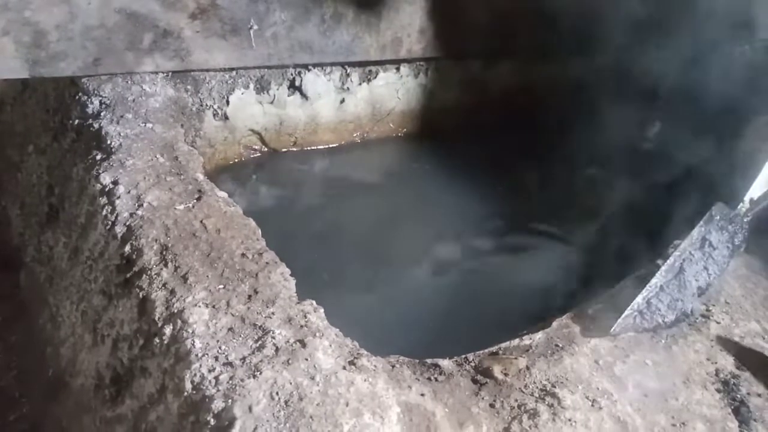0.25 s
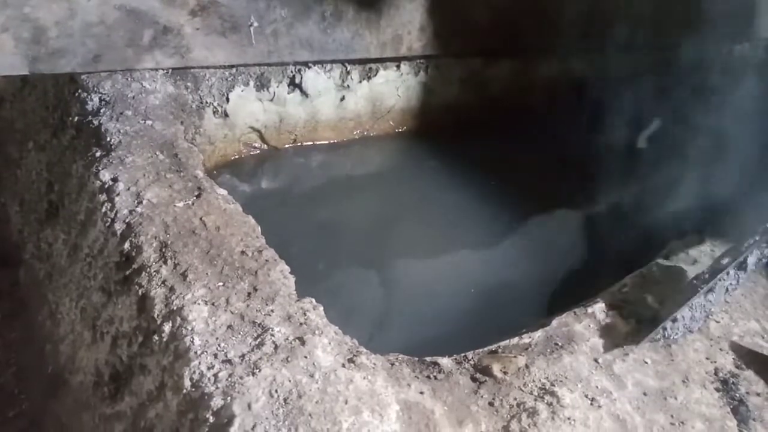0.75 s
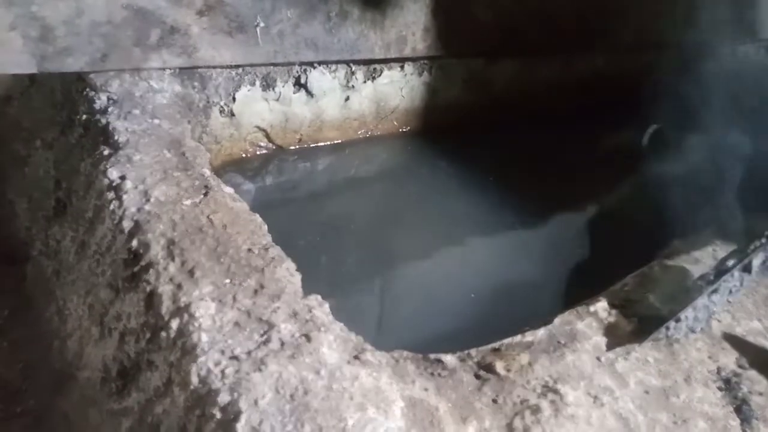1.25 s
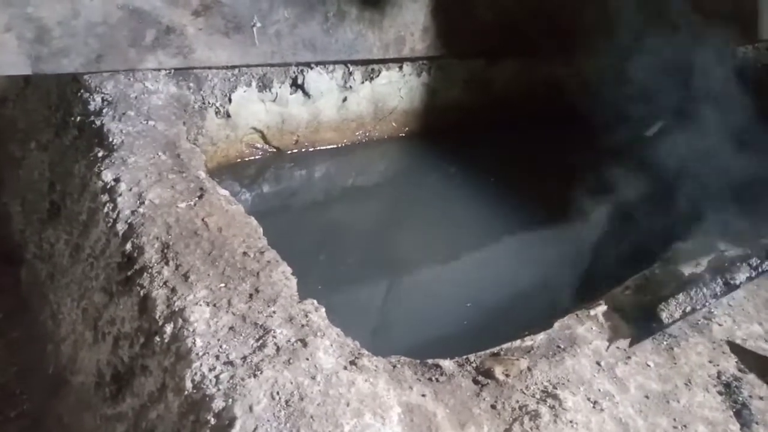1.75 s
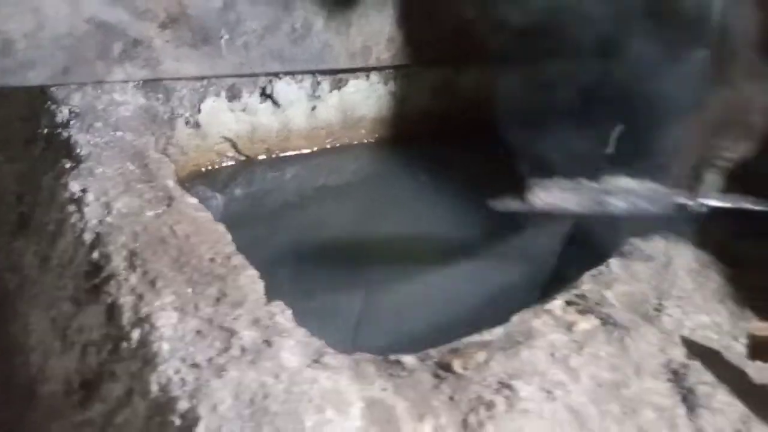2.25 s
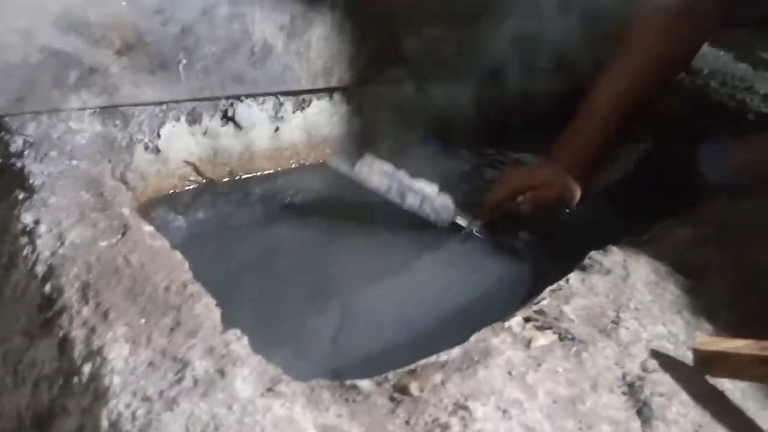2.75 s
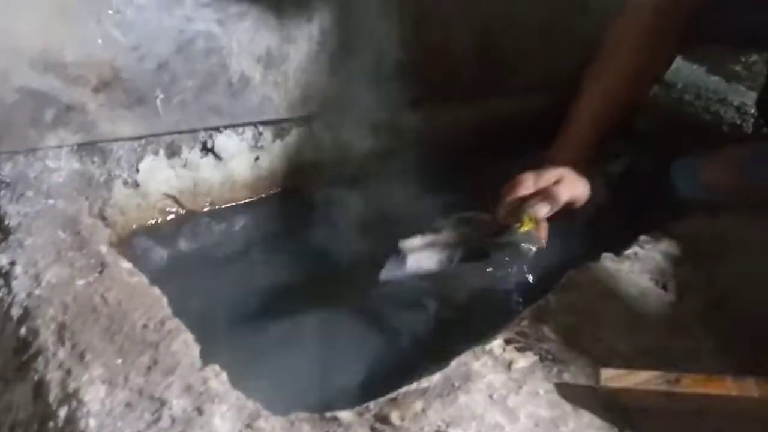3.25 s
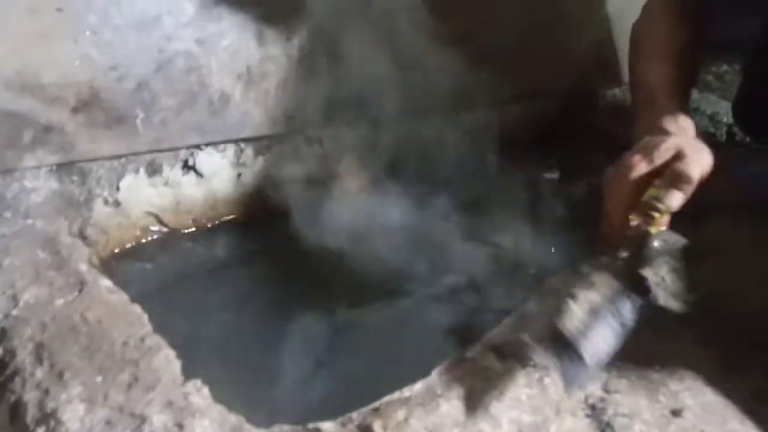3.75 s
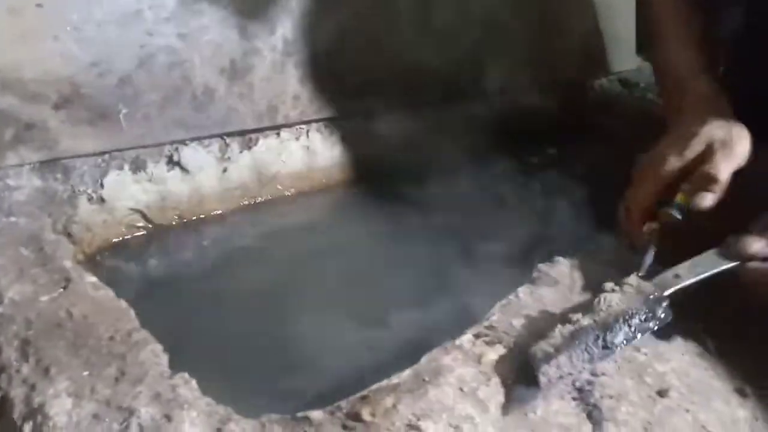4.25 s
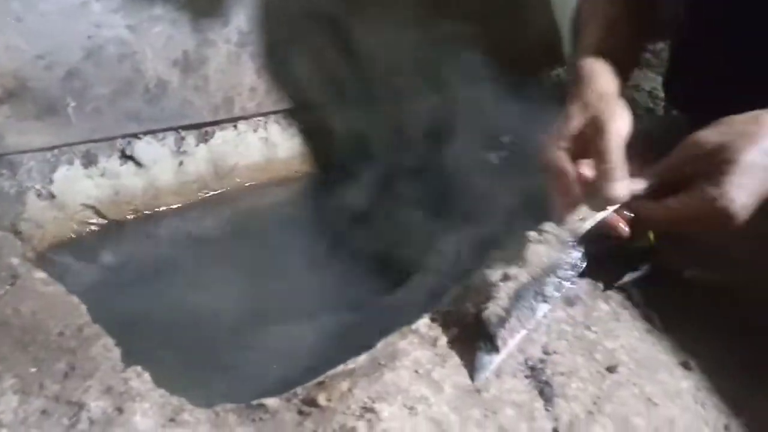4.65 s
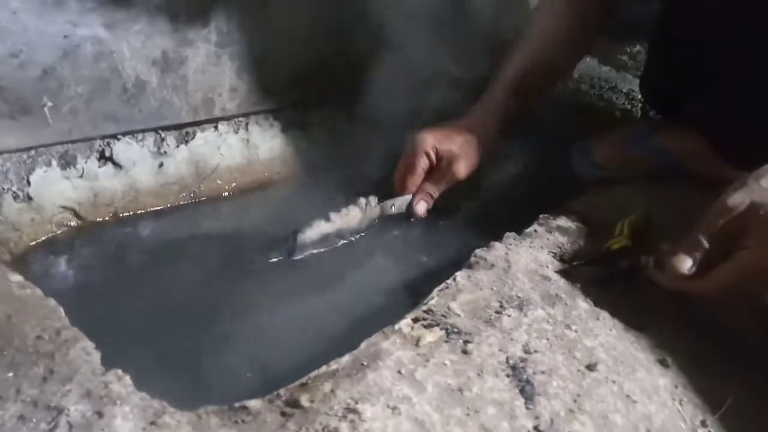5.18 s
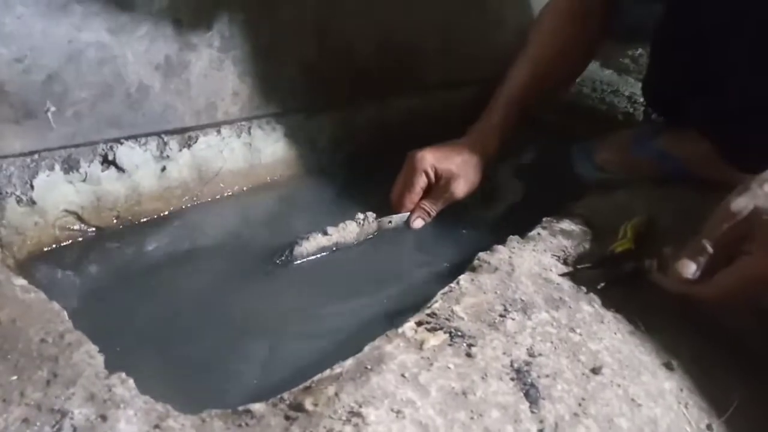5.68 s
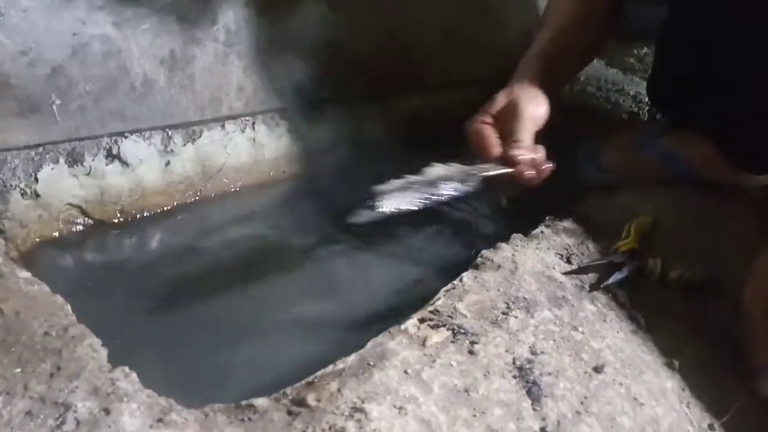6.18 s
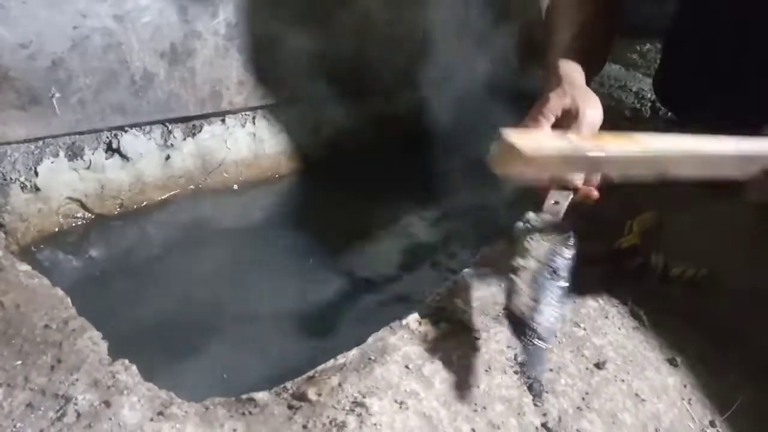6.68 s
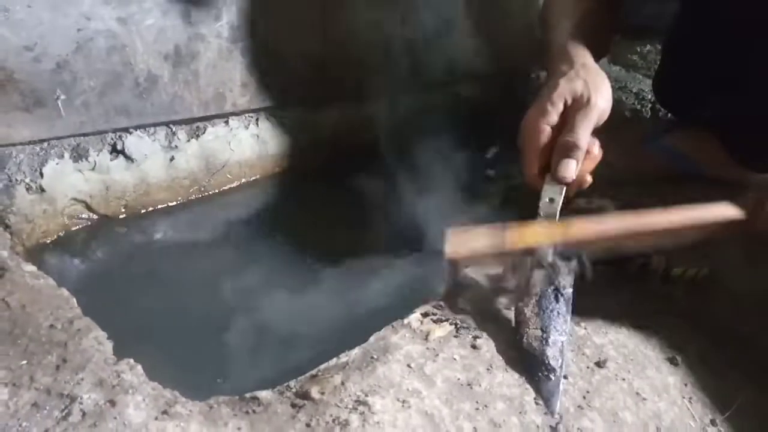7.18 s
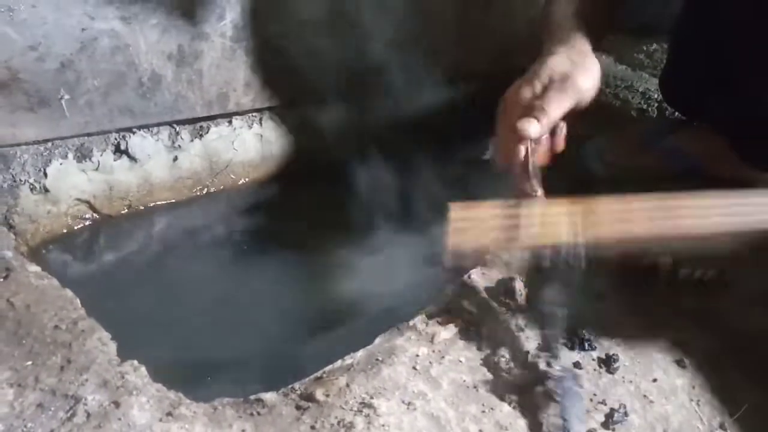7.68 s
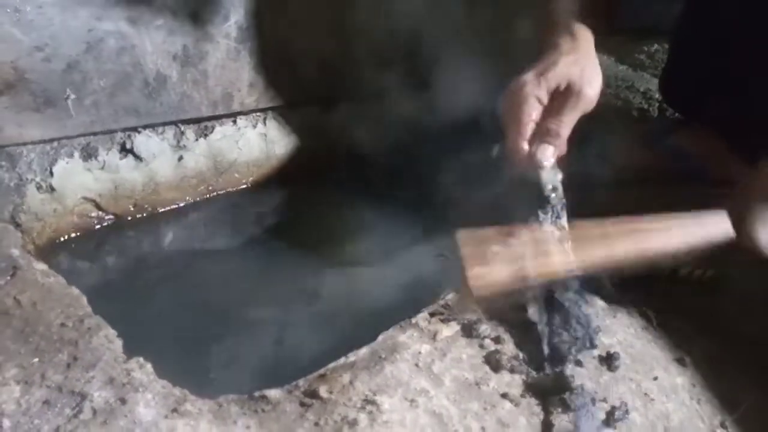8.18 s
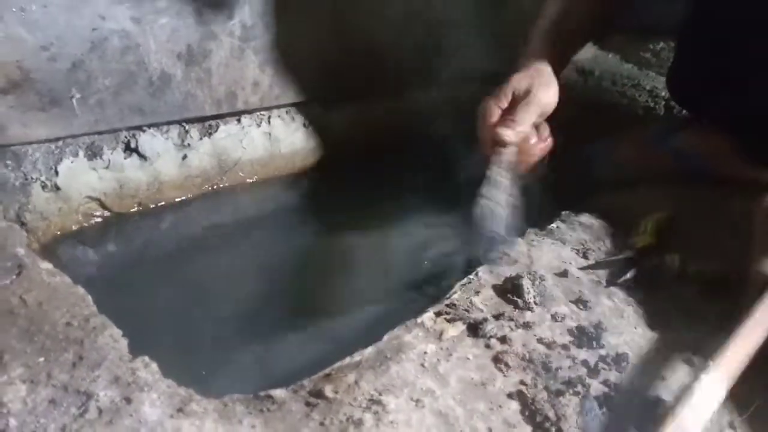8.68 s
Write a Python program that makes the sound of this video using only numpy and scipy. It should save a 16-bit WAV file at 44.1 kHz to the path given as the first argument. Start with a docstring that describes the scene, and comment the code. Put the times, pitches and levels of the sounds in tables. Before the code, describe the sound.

A steady airy hiss with a faint whistling edge and a low distant traffic rumble, engine notes swelling and sagging, run throughout; a thin insect pulses high up. In the first second a far bird gives quick falling chirps amid faint steam sizzles. Around 2.7 a few ticks and a tiny drip, at 3.0 a light tap. From 3.6 to 4.1 hard knocks of a clay-coated blade on concrete crack and clank, the loudest at 3.63, 3.8 and 4.0, with wet drops; another dull knock at 4.4. Soft sizzle, bubbling and lapping follow, a low bump at 4.85, faint chirps near 5.7-6.1. At 6.2-6.4 a light clattering run. From 7.1 to 7.4 a wooden slat scrapes crunchy, gritty clay, with smaller snaps after. A second scrape at 8.0-8.3 ends in a firm knock, then crumbs and bright chips tick down until 8.8. Close microphone, short dull reflections.

```python
"""Steady hiss, a low rumble like far traffic, faint sizzles and a distant bird come first; an insect pulses thinly.
A clay-coated blade, hot from the forge, is then knocked on the concrete rim of a water trough:
shaped noise cracks, decaying sines ring the steel. A wooden slat scrapes off gritty clay (dense random
fractures through resonances) and crumbs tick down. Drops are pings; steam, water, hiss and rumble are
mostly filtered noise; bubbles, engine notes and chirps are gliding sines."""
import sys
import numpy as np
from scipy import signal
from scipy.fft import rfft, irfft, next_fast_len
from scipy.io import wavfile
from scipy.ndimage import uniform_filter1d, minimum_filter1d

SR = 44100
rng = np.random.default_rng(int(sys.argv[2]) if len(sys.argv) > 2 else 0)


def transcribe(signal):
    """Save signal, clipped to [-1, 1], as a 16-bit WAV file at the path in sys.argv[1]."""
    frames = np.atleast_2d(signal).T
    limited = np.clip(frames, -1, 1)
    pcm = np.round(limited * 32767).astype(np.int16)
    wavfile.write(sys.argv[1], SR, pcm)


N = 393813
TIME = np.arange(N) / SR
RING = TIME[:SR // 4]  # time axis of one short event

# spectrum of clay breaking up: freq_hz, density_db (relative, per Hz)
GRIT_SPECTRUM = [(250, -58), (500, 2.5), (680, -3.5), (900, 1), (1700, 0), (2200, 7), (3000, 2.5),
                 (3900, 2.5), (5000, -13), (5600, -12.5), (6400, -11.5), (7900, -14.5), (9300, -31),
                 (15500, -33.5)]


def undb(db):
    """Decibels to gain."""
    return 10 ** (np.asarray(db) / 20)


def unit(x):
    """Scale to rms 1."""
    return x / np.sqrt(np.mean(x ** 2))


def punch(x):
    """Scale an event to the energy of rms 1 held for 10 ms."""
    return x / np.sqrt(np.sum(x ** 2) / (SR / 100))


def curve(rows, axis=1):
    """One column of a table, joined by straight lines in time."""
    rows = np.array(rows)
    return np.interp(TIME, rows[:, 0], rows[:, axis])


def fade(t60_s):
    """Exponential decay, 60 dB in t60_s."""
    return np.exp(-np.log(1000) * RING / t60_s)


def gate(start_s, length_s, half_rise_s, release_s):
    """Linear rise centred on the start, hold, exponential release (time constant)."""
    rise = np.clip((TIME - start_s) / half_rise_s / 2 + .5, 0, 1)
    return rise * np.exp(-np.maximum(TIME - start_s - length_s, 0) / release_s)


def surges(rows):
    """Sum of bell-shaped swells, length_s wide between their 1/e points."""
    return sum(undb(db) * np.exp(-(2 * (TIME - center_s) / length_s) ** 2)
               for center_s, length_s, db in rows)


def walk(knots_per_s):
    """Random values joined by straight lines, standard deviation about 0.56."""
    knots = rng.standard_normal(int(N / SR * knots_per_s) + 2)
    return 0.68 * np.interp(TIME * knots_per_s, np.arange(len(knots)), knots)


def shape(hz, points):
    """Gain at hz, from spectrum points joined in dB over log frequency."""
    f, db = np.transpose(points)
    return undb(np.interp(np.log(hz + 1), np.log(f), db))


def colour(x, points):
    """Give a long sound a spectrum."""
    size = next_fast_len(len(x))
    gain = shape(np.fft.rfftfreq(size, 1 / SR), points)
    return irfft(rfft(x, size) * gain, size)[:len(x)]


def strike(x, points, contact_hz, size=1024):
    """Minimum-phase colour of a blow: a softer contact rolls off the treble."""
    hz = np.fft.rfftfreq(size, 1 / SR)
    gain = shape(hz, points) / np.sqrt(1 + (hz / contact_hz) ** 5.8)
    # folding the cepstrum makes the filter causal
    cepstrum = irfft(np.log(gain))
    cepstrum[1:size // 2] *= 2
    cepstrum[size // 2 + 1:] = 0
    return signal.fftconvolve(x, irfft(np.exp(rfft(cepstrum))))[:len(x)]


def band(x, hz, width_hz):
    """One resonance."""
    return signal.lfilter(*signal.iirpeak(hz, hz / width_hz, fs=SR), x)


def noise_band(hz, width_hz):
    """White noise through the same resonance twice, at rms 1."""
    return unit(band(band(rng.standard_normal(N), hz, width_hz), hz, width_hz))


def add(out, s, x):
    """Mix a sound in at a time."""
    i = max(int(s * SR), 0)
    out[i:i + len(x)] += x[:max(N - i, 0)]


def mode(hz, t60_s):
    """One fading partial with a random phase."""
    return np.sin(2 * np.pi * (hz * RING + rng.random())) * fade(t60_s)


def ping(hz, t60_s):
    """One short ring with a soft start."""
    return punch((1 - np.exp(-(RING / 0.0005) ** 2)) * mode(hz, t60_s))


def burst(points, t60_s, contact_hz):
    """A splinter of coloured, decaying noise."""
    return punch(strike(rng.standard_normal(len(RING)) * fade(t60_s), points, contact_hz))


def snap(t60_s):
    """The bright tick of a flake breaking off."""
    return burst([(1000, 3), (6500, 2), (9500, -4), (15000, -2)], t60_s, 14000)


def patter(ticks_per_s, t60_s):
    """A dying run of random ticks."""
    ticks = rng.random(len(RING)) < ticks_per_s / SR
    return ticks * rng.standard_normal(len(RING)) * fade(t60_s)


def crack(noise, t60_s, contact_hz, clay_hz):
    """Clay crushed on concrete: noise, impulse and debris excite the clay; the trough wall adds a thump."""
    # dull crack of clay and concrete: freq_hz, gain_db
    crack_spectrum = [(100, -26), (190, -13), (290, 2.5), (430, 0.5), (650, -1.5), (900, -1), (1400, -2.5),
                      (2000, -0.5), (2600, -1), (3100, 0.5), (3800, -4), (4900, -2.5), (5600, -24),
                      (6400, -10.5), (8000, -11.5), (11000, -29), (15000, -39)]
    push = punch(signal.unit_impulse(len(RING)))
    debris = punch(patter(900, .18) * (RING > .008))
    source = punch(noise * fade(t60_s)) + undb(-4.5) * push + undb(-14.5) * debris
    crush = strike(source, crack_spectrum, contact_hz)
    clay = punch(punch(crush) + undb(0.5) * punch(band(crush, clay_hz, 310)))
    thump = ping(304, .025)
    return clay + undb(-20.5) * thump


def steel_ring():
    """Bending modes of the hand-damped blade; each contact point favours other modes."""
    # bending modes: freq_hz, level_db, t60_s
    bending_modes = [(735, -15, .08), (872, -9.5, .07), (920, -7, 0.041), (1110, -6.5, 0.045),
                     (1210, -3.5, 0.052), (1470, -8, .03), (1660, -8, .04), (1818, -0.5, 0.062),
                     (2100, -13, 0.08), (2209, -0.5, 0.063), (2517, -11, 0.044), (2670, -2.5, 0.054),
                     (3390, -20, 0.069), (4730, -27, .04)]
    scatter_db = 1.5  # standard deviation
    return punch(sum(undb(db + scatter_db * rng.standard_normal()) * mode(hz, t60_s)
                     for hz, db, t60_s in bending_modes))


def edge_ring(noise, edge_hz):
    """The edge rings as a close pair of modes over a noise rasp."""
    t60_s, split_ratio = .031, .022
    pair = mode(edge_hz, t60_s) + undb(-19) * mode(edge_hz * (1 + split_ratio), t60_s)
    rasp = band(band(noise * fade(0.043), edge_hz, 1000), edge_hz, 1000)
    return punch(punch(pair) + undb(-8) * punch(rasp))


def knocks():
    """Each blow crushes clay on concrete, rings the steel, snaps a flake and chatters on the rim."""
    # blade on rim: start_s, level_db, contact_bandwidth_hz, clay_resonance_hz, steel_ring_db,
    # edge_mode_hz, edge_mode_db, brittle_snap_db
    blows = [(3.012, -42, 3600, 1400, -10, 1044, -2, -40),
             (3.6339, -17.5, 2000, 1265, -0.5, 2750, -14, -60), (3.693, -42, 2200, 1200, -5, 3370, -5, -31),
             (3.7953, -16.5, 4000, 935, 3.5, 3373, 4.5, -44),
             (3.8455, -31.5, 1900, 1490, -10, 3380, -14, -48),
             (4.002, -17.5, 3400, 1350, -6, 4600, -25, -31), (4.0097, -26, 6900, 2200, 5.5, 3630, 7.5, -24),
             (4.0735, -28, 2600, 1460, -2, 3730, -13, -39), (4.1136, -37.5, 3000, 596, -19, 3650, -23, -30),
             (4.3948, -16.5, 1750, 1290, -22, 3030, -28, -48),
             (6.211, -34.5, 1390, 560, -12, 3700, -13, -48),
             (6.218, -33.5, 1680, 1160, -16, 3400, -11.5, -21),
             (6.231, -47, 1700, 1280, -11, 3700, -11, -30), (6.266, -51.5, 2600, 1310, -14, 3790, 4.5, -26),
             (6.275, -44, 800, 380, -8, 3750, -9, -32), (6.284, -46, 900, 400, -14, 3650, -13, -34),
             (6.293, -45.5, 2200, 1300, -14, 3520, -7, -31), (6.3446, -40, 1900, 496, -11, 2030, 4, -20),
             (6.373, -43, 1300, 500, -10, 3650, -16, -35), (7.432, -39.5, 5000, 2600, -24, 3590, -1, -24),
             (7.448, -43, 1500, 400, -18, 3500, -11, -30), (7.768, -51, 2000, 1100, -10, 2400, -6, -35),
             (8.277, -28.5, 2620, 840, -13, 3330, -15, -31)]
    glancing_db, hard_db = -40, -17
    glancing_t60_s, hard_t60_s = 0.044, 0.028  # glancing blows drag on
    out = np.zeros(N)
    swell = 1 - np.exp(-(RING / 0.00021) ** 2)  # metal takes a moment to start ringing
    for s, db, contact_hz, clay_hz, ring_db, edge_hz, edge_db, snap_db in blows:
        t60_s = np.interp(db, [glancing_db, hard_db], [glancing_t60_s, hard_t60_s])
        noise = rng.standard_normal(len(RING))
        clay = crack(noise, t60_s, contact_hz, clay_hz)
        steel = undb(ring_db) * steel_ring()
        metal = swell * (steel + undb(edge_db) * edge_ring(noise, edge_hz))
        taps = patter(900, .06) * (RING > .003)
        chatter = signal.fftconvolve(metal, taps / np.linalg.norm(taps))[:len(RING)]
        flake = undb(snap_db) * snap(0.0016)
        add(out, s, undb(db) * (clay + flake + metal + undb(-11) * chatter))
    return out


def grit(grains_per_s, spread_db):
    """Dense tiny fractures of very unequal size."""
    count = int(grains_per_s * N / SR)
    when, size, sign = rng.random((count, 3)).T
    signs = 2 * sign - 1  # random polarity and strength
    sizes = undb(spread_db * np.minimum(-np.log(1 - size), 5)) * signs
    return unit(colour(np.bincount((when * N).astype(int), sizes, N), GRIT_SPECTRUM))


def flakes():
    """Coarse flakes, each a short ring at its own pitch as the slat drags over it."""
    flakes_per_s, low_hz, high_hz, spread_db = 800, 950, 4700, 14
    out, t = np.zeros(N), RING[:SR // 40]
    decay = fade(.018)[:len(t)]
    for when, pitch, size in rng.random((int(flakes_per_s * N / SR), 3)):
        hz = low_hz + (high_hz - low_hz) * pitch
        ring = np.sin(2 * np.pi * hz * t) * decay
        add(out, when * N / SR, undb(spread_db * size ** 2) * ring)
    return unit(out)


def scraping():
    """Clay rubs on the rim, then catches and slips under the slat; growing pressure adds body to the grit."""
    # rubbing strokes: start_s, length_s, level_db, final_pressure (0-1)
    strokes = [(6.252, 0.06, -54.5, 0.8), (6.836, 0.26, -58, 0.54), (7.103, 0.022, -38, 0.24),
               (7.138, 0.081, -41.5, 0.26), (7.23, 0.17, -48.5, 0.73), (7.301, 0.034, -37, 0.2),
               (8, 0.11, -54.5, 0.6), (8.147, 0.044, -40, 0.33), (8.206, 0.013, -40, 0),
               (8.226, 0.046, -39, 0.7), (8.37, 0.22, -57.5, 0.5)]
    # slat pressed on the blade: resonance_hz, level_db
    slat_modes = [(900, -2), (1360, -0.5), (2030, -0.5), (2730, -5), (3560, 4.5), (4200, -33), (4650, -5)]
    first_pressure_ratio = 0.53  # of the final value
    contact, weight = np.zeros(N), np.zeros(N)
    for start_s, length_s, db, pressure in strokes:
        stroke = undb(db) * gate(start_s, length_s, 0.016, 0.012)
        growth = np.interp(TIME, [start_s, start_s + length_s], [first_pressure_ratio, 1])
        contact += stroke
        weight += stroke * pressure * growth
    catch = undb(2.6 * walk(90))
    grains = grit(grains_per_s=5000, spread_db=2.2) * catch
    body = signal.sosfiltfilt(signal.butter(2, 2800, fs=SR, output="sos"), grains)
    grains = grains - body + 0.83 * weight / (contact + 1e-9) * body
    # the contact point travels, so resonances come and go
    rings = sum(unit(band(grains, hz, 170)) * undb(7 * walk(45)) * undb(db) for hz, db in slat_modes)
    return (undb(-1.8) * grains + undb(-15) * rings + undb(-5) * flakes()) * contact


def lumps():
    """A lump gives way with one crack and a quick run of smaller fractures."""
    # coarse lumps breaking under the slat: start_s, level_db, pitch_hz
    breaks = [(7.1168, -41, 3600), (7.149, -48, 2100), (7.183, -45, 1980), (7.224, -35.5, 2870),
              (7.258, -49, 1300), (7.2928, -45, 3500), (7.3077, -34, 3880), (7.329, -36, 1010),
              (7.342, -36, 2700), (7.3752, -47, 1350), (8.1577, -45, 2200), (8.173, -42, 2300),
              (8.2035, -33.5, 2090), (8.208, -33.5, 4430), (8.2405, -33.5, 3520), (8.247, -34.5, 2130)]
    out = np.zeros(N)
    for s, db, hz in breaks:
        run = patter(2500, 0.059)
        crunch = punch(strike(run + 0.45 * signal.unit_impulse(len(RING)), GRIT_SPECTRUM, 14000))
        resonance = punch(band(crunch, hz, 430))
        add(out, s, undb(db) * punch(crunch + undb(2) * resonance))
    return out


def chips():
    """A chip cracks off as a noise splinter and rings the edge of the blade."""
    # clay chips snapping off: start_s, level_db, pitch_hz, brittle_snap_db
    breaks = [(2.651, -60, 1690, -2), (2.755, -47.5, 3800, -26), (2.773, -60, 3640, -10),
              (3.335, -47.5, 3700, -22), (3.912, -49.5, 3400, -24), (4.0905, -54, 3650, -21),
              (4.164, -48.5, 2970, -16), (4.197, -57, 4020, -20), (4.297, -61, 7300, -2),
              (4.491, -57.5, 4060, -27), (6.262, -64, 6200, -21), (6.283, -64, 6050, -18),
              (7.585, -48.5, 3800, -22), (8.0453, -43, 3830, -27), (8.056, -48, 3760, -22),
              (8.072, -59, 3900, -20), (8.095, -54, 4030, -16), (8.383, -47.5, 3670, -13),
              (8.457, -53.5, 4470, -3), (8.485, -47.5, 3900, -6), (8.791, -51.5, 2760, -24)]
    out = np.zeros(N)
    for s, db, hz, snap_db in breaks:
        splinter = burst(GRIT_SPECTRUM, 0.05, 14000) + undb(snap_db) * snap(0.036)
        add(out, s, undb(db) * (splinter + undb(-2) * ping(hz, .026)))
    return out


def crumbs():
    """Loosened dust patters down as sparse, bright ticks."""
    # falls of fine clay on the rim: start_s, length_s, level_db
    falls = [(7.99, .09, -74), (8.364, 0.21, -68.5)]
    # falling dust: freq_hz, density_db (relative, per Hz)
    dust_spectrum = [(1500, -22), (4600, 6), (5600, -7), (6500, 8), (9300, -5), (10500, -16), (15500, -4)]
    ticks_per_s = 350
    clicks = (rng.random(N) < ticks_per_s / SR) * rng.standard_normal(N)
    flow = sum(undb(db) * gate(start_s, length_s, .02, .025) for start_s, length_s, db in falls)
    return unit(colour(clicks, dust_spectrum)) * flow


def drips():
    """Each drop or wet fleck rings at its own pitch, with a little noise spray."""
    # landings: start_s, level_db, pitch_hz, t60_s
    drops = [(2.649, -46.5, 1660, 0.019), (3.351, -38, 2390, .022), (3.476, -53, 3200, .04),
             (3.93, -40.5, 478, 0.02), (4.039, -34, 443, 0.017), (4.048, -33, 564, 0.021),
             (4.1, -41.5, 600, 0.017), (4.322, -42, 1370, 0.016), (4.409, -34.5, 1174, 0.031),
             (7.484, -40.5, 3560, 0.061)]
    spray_reach = 4.2  # spray bandwidth / drop pitch
    out = np.zeros(N)
    for s, db, hz, t60_s in drops:
        spray = burst(GRIT_SPECTRUM, 0.14, spray_reach * hz)
        add(out, s, undb(db) * (ping(hz, t60_s) + undb(-9.5) * spray))
    return out


def sizzling():
    """Water flashes to steam on the warm blade: gritty sizzles and narrow, fluttering puffs."""
    # sizzles of wet steel: center_s, length_s, level_db
    sizzles = [(0.086, 0.038, -57), (.226, .05, -56), (.39, .05, -57), (2.756, 0.076, -54.5),
               (3.16, 0.066, -54.5), (3.362, 0.13, -51), (4.648, 0.56, -63), (6.27, 0.23, -56.5),
               (6.49, 0.034, -56), (6.66, 0.25, -59)]
    # resonant puffs of steam under wet clay: center_s, length_s, level_db
    puffs = [(2.745, 0.013, -55), (2.875, 0.033, -61), (3.0, .03, -60), (3.15, 0.061, -63),
             (3.385, .04, -62), (4.21, 0.068, -62), (4.56, 0.1, -64), (4.66, .06, -62), (4.78, 0.045, -64)]
    jet = noise_band(3870, 630)
    flutter = undb(3 * walk(60))
    crackle = unit(band(grit(grains_per_s=2200, spread_db=3.5), 3340, 2100))
    return surges(sizzles) * crackle + surges(puffs) * flutter * jet


def simmering():
    """Bubbles round the hot steel: decaying sines of unequal size, rising in pitch, in soft surges."""
    # stirring and simmering water: center_s, length_s, level_db
    simmers = [(.1, .3, -70), (1.25, 0.23, -70.5), (1.8, 0.21, -71), (3.25, 0.71, -63.5), (4.68, 0.58, -60),
               (5.3, .3, -62), (6.05, 0.2, -60.5), (6.75, 0.54, -57.5)]
    bubbles_per_s, low_hz, high_hz = 170, 503, 3630
    cycles, rise_ratio = 37, 0.4  # life in periods of the first pitch; pitch gain over life
    out = np.zeros(N)
    for when, pitch, size in rng.random((int(bubbles_per_s * N / SR), 3)):
        hz = low_hz * (high_hz / low_hz) ** pitch
        age = RING[:int(cycles / hz * SR)] * hz / cycles  # 0-1
        phase = 2 * np.pi * cycles * age * (1 + rise_ratio * age / 2)
        ring = np.sin(phase) * np.exp(-np.log(1000) * age)
        add(out, when * N / SR, undb(14 * size ** 2) * ring)
    return unit(out) * surges(simmers)


def room(x):
    """Near surfaces return two slaps and a short, dull noise tail."""
    # first returns from trough and wall: delay_s, level_db
    echoes = [(0.0216, -32.5), (0.027, -27)]
    tail = rng.standard_normal(len(RING)) * fade(0.3) * np.clip(RING / 0.018, 0, 1)
    tail = strike(tail, [(100, 23), (600, 7.5), (2500, -2), (4000, -3.5), (9000, -0.5)], 14000)
    out = x + undb(-17.0) * signal.fftconvolve(x, tail / np.linalg.norm(tail))[:N]
    for delay_s, db in echoes:
        add(out, delay_s, undb(db) * x)
    return out


def low_swells():
    """Low fluttering noise: stirred water lapping, and one short dull bump as the blade changes hands."""
    # lapping water, and the bump at 4.85 s: center_s, length_s, level_db
    swells = [(1.4, 0.69, -58), (1.95, 0.26, -62), (3.1, 0.55, -60), (4.845, 0.05, -47.5), (5.1, 0.66, -58),
              (6.7, 0.99, -64)]
    return noise_band(371, 280) * undb(3 * walk(18)) * surges(swells)


def steam():
    """The hot blade steams faintly at first: fine grit fading 7.3 dB per second."""
    return unit(band(grit(grains_per_s=6600, spread_db=3.5), 5000, 5600)) * undb(-60 - 7.3 * TIME)


def engine_notes():
    """Sines that swell and sink while their pitch sags."""
    # engine notes: start_s, length_s, start_pitch_hz, level_db
    hums = [(.4, 0.4, 175, -42.5), (1.0, 2.1, 57.5, -48), (1.8, 0.49, 175, -43.5), (2.15, 1.52, 76, -42.5),
            (2.45, 0.53, 145, -44), (3.42, 0.37, 106.3, -39), (3.85, 0.17, 106.7, -38),
            (3.86, .18, 144.6, -40.5), (4.95, .35, 109.4, -43.5), (5.7, 0.58, 184, -46),
            (6.35, 0.29, 130.7, -40.5), (6.7, 0.43, 171.4, -42), (6.85, .55, 101.6, -41),
            (7.58, 0.24, 168.2, -43), (7.7, 0.26, 129.1, -41), (7.9, 0.21, 120.8, -40.5),
            (8.15, 0.41, 116.5, -37.5)]
    sag_per_s = 0.041  # share of the starting pitch
    out = np.zeros(N)
    for start_s, length_s, hz, db in hums:
        t = TIME[:int(length_s * SR)]
        phase = 2 * np.pi * np.cumsum(hz * (1 - sag_per_s * t)) / SR
        add(out, start_s, undb(db) * signal.windows.tukey(len(t), .7) * np.sin(phase))
    return out


def rumble():
    """Far traffic: low noise roar, levelled below and above 150 Hz, with engine notes."""
    # far traffic: freq_hz, density_db (relative, per Hz)
    roar_spectrum = [(15, -24), (27, -31), (36, -24.5), (52, -11), (68, -1.5), (100, -2), (170, -4),
                     (230, -7.5), (290, -8), (400, -18), (550, -21.5), (750, -29.5), (1200, -66.5)]
    # roar level below / above 150 Hz: time_s, deep_db, upper_db
    roar_level = [(0, -43.5, -48), (.5, -44.5, -51.5), (1.4, -43, -47.5), (2.8, -44, -49), (4.4, -45, -48),
                  (4.9, -43.5, -47.5), (5.6, -44.5, -49.5), (6.4, -43, -48.5), (7.6, -44.5, -48),
                  (8.93, -43, -47.5)]
    roar = colour(rng.standard_normal(N), roar_spectrum)
    deep = signal.sosfiltfilt(signal.butter(4, 150, fs=SR, output="sos"), roar)
    upper = unit(roar - deep) * undb(curve(roar_level, axis=2))
    return unit(deep) * undb(curve(roar_level)) + upper + engine_notes()


def hiss():
    """Airy noise, its bands slowly wandering, with two close whistling resonances."""
    # steady hiss of the place: freq_hz, density_db (relative, per Hz)
    air_spectrum = [(400, -3), (700, -10), (900, -3), (1500, -3.5), (1800, -3.5), (2250, -2), (2800, -5),
                    (4100, -12.5), (5000, -24.5), (5550, -33.5), (6400, -25.5), (7900, -29.5), (8700, -34),
                    (10000, -31.5), (11100, -51), (15500, -53)]
    air = unit(colour(rng.standard_normal(N), air_spectrum))
    for hz, wander_db in ((600, 1.8), (800, 2), (1100, 1.6), (1600, 1.1), (3400, .9)):
        boost = undb(wander_db * (walk(3) + walk(14))) - 1.12
        air = air + boost * band(air, hz, hz / 3)
    whistle = sum(noise_band(hz, 176) * undb(2 * walk(7)) for hz in (2193, 2307))
    return (air + undb(-8.5) * whistle) * undb(-54 + 0.5 * walk(8.3))


def bird():
    """A small bird far off: two or three short falling syllables, blurred by the walls."""
    # chirps: first_syllable_center_s, syllable_count, level_db
    chirps = [(.196, 2, -52), (.407, 2, -52), (.557, 3, -52), (.757, 2, -51), (5.668, 3, -58),
              (5.875, 3, -58), (6.052, 2, -58)]
    gap_s, syllable_s, high_hz, low_hz = .027, .016, 5050, 4250  # gap_s: onset to onset
    out = np.zeros(N)
    t = RING[RING < syllable_s]
    for s, syllable_count, db in chirps:
        for k in range(syllable_count):
            hz = np.linspace(high_hz, low_hz, len(t)) + 25 * rng.standard_normal()
            tone = np.hanning(len(t)) * np.sin(2 * np.pi * np.cumsum(hz) / SR)
            syllable = undb(db + rng.standard_normal()) * tone
            walls = rng.standard_normal(len(RING)) * fade(.07)
            blurred = signal.fftconvolve(syllable, walls / np.linalg.norm(walls))
            start_s = s - syllable_s / 2 + k * gap_s + .002 * rng.standard_normal()
            add(out, start_s, undb(-4) * syllable)
            add(out, start_s, undb(-5.5) * blurred)
    return out


def insect():
    """A high, thin noise band pulses unevenly, about 5.7 times a second."""
    throb = np.cos(np.pi * (5.7 * TIME + .2 * walk(3))) ** 2 * undb(2.5 * walk(6))
    return undb(-78) * throb * noise_band(7950, 1100)


def scene():
    """The work at the trough, with its echoes, over the sounds of the place."""
    blade = knocks() + scraping() + lumps() + chips() + crumbs()
    water = drips() + sizzling() + simmering()
    unechoed = low_swells() + steam() + rumble() + hiss() + bird() + insect()
    return (room(blade + water) + unechoed)[None]


def record(dry):
    """The microphone port dips the treble, a limiter eases peaks above 0.85, then the top is cut."""
    dip_hz, dip_width_hz, dip_depth, top_hz = 5510, 340, 0.5, 15600
    dry = dry - dip_depth * band(dry, dip_hz, dip_width_hz)
    size = SR // 500  # 2 ms
    peak_gain = .85 / np.maximum(np.abs(dry), .85)
    gain = uniform_filter1d(minimum_filter1d(peak_gain, 2 * size + 1), size)
    return signal.sosfilt(signal.ellip(8, .2, 70, top_hz, fs=SR, output="sos"), dry * gain)


dry = scene()
out = record(dry)
transcribe(out)
```